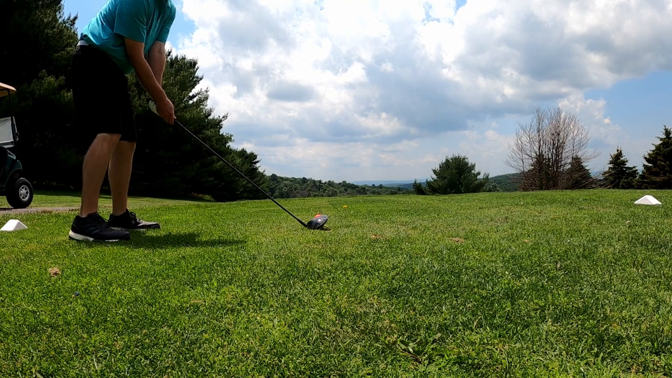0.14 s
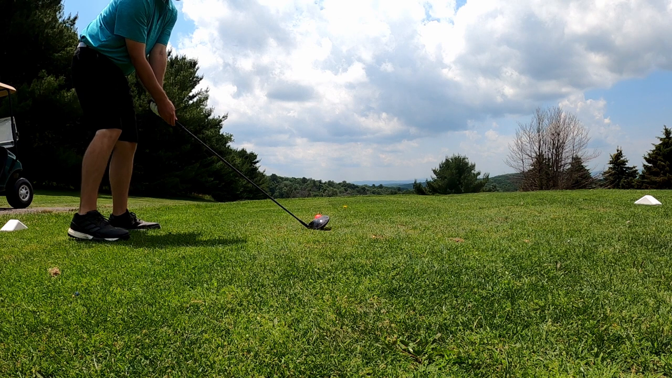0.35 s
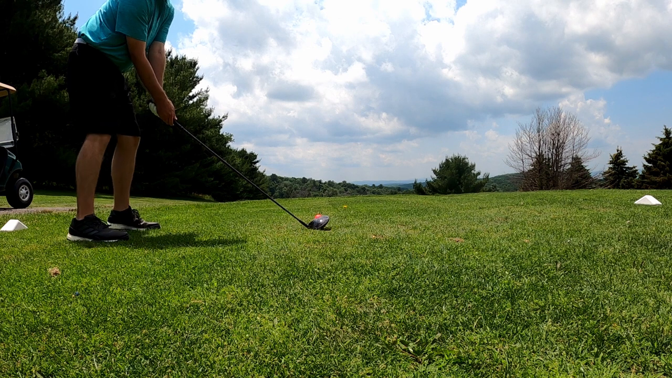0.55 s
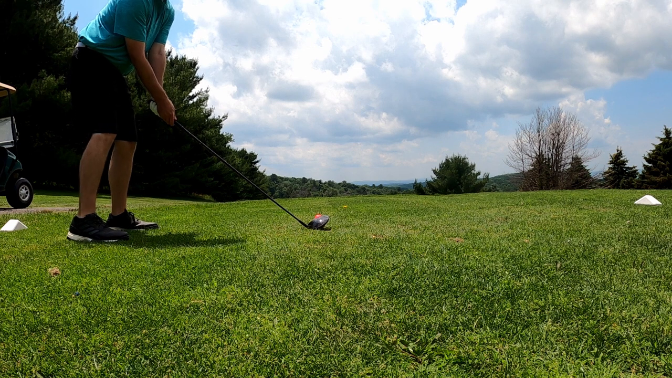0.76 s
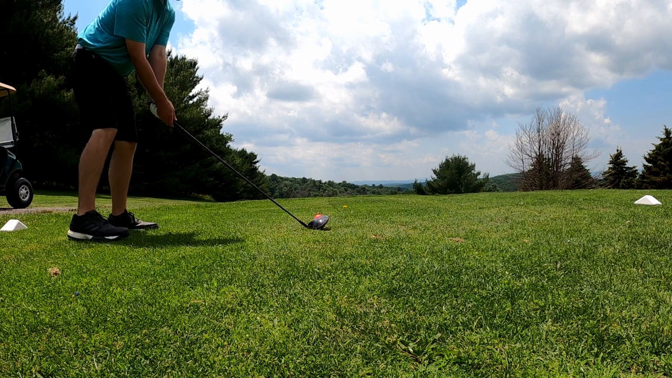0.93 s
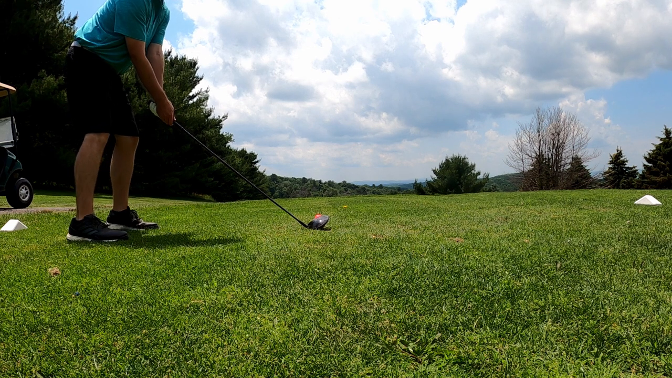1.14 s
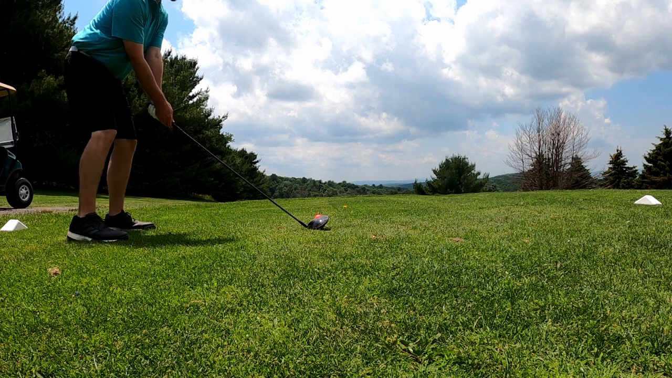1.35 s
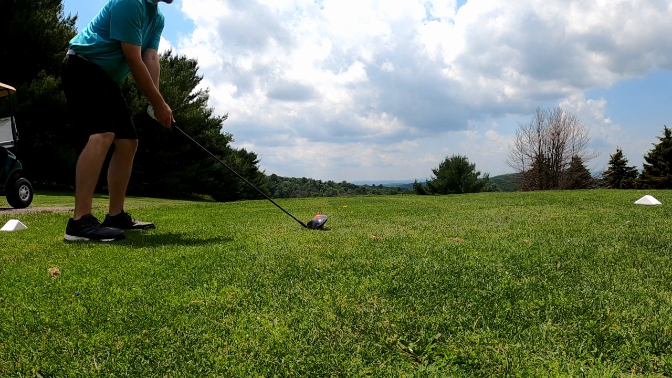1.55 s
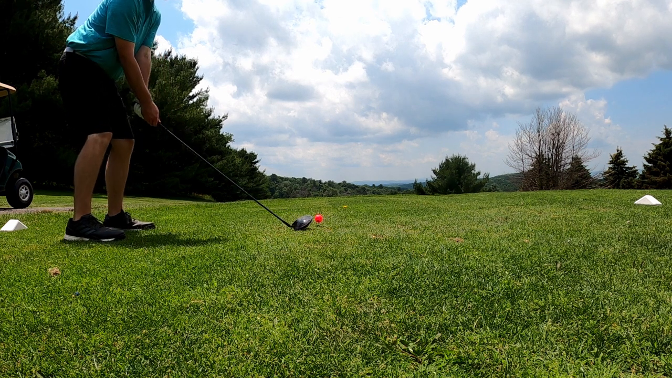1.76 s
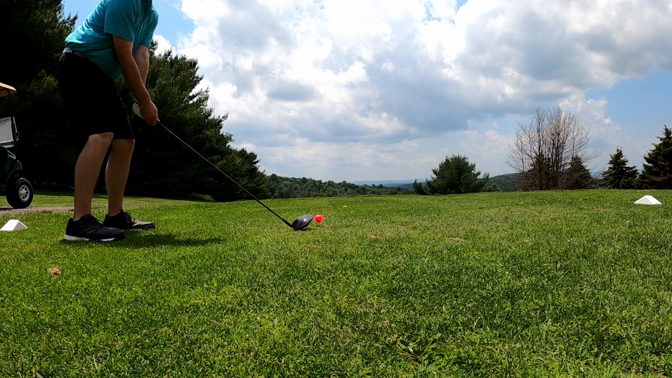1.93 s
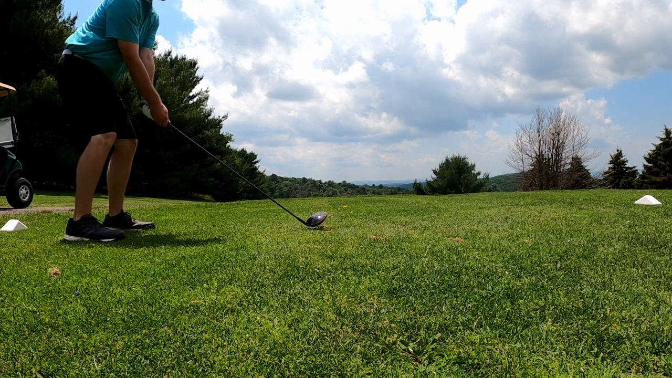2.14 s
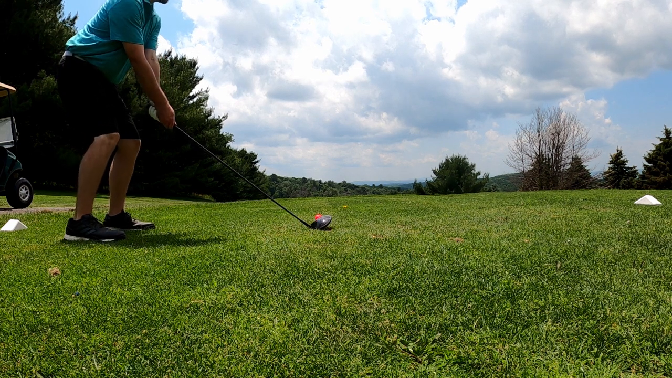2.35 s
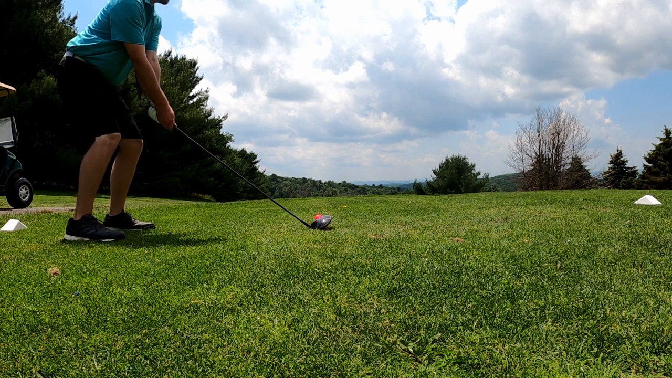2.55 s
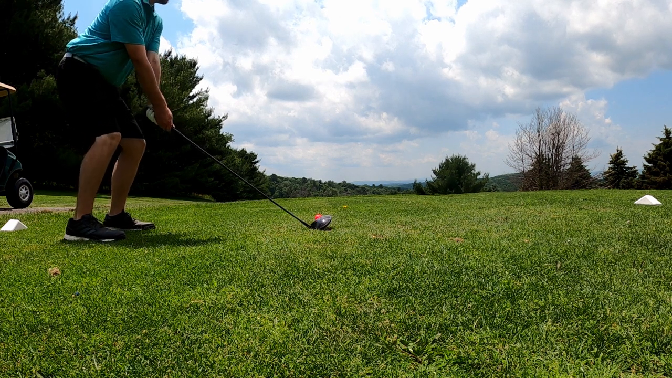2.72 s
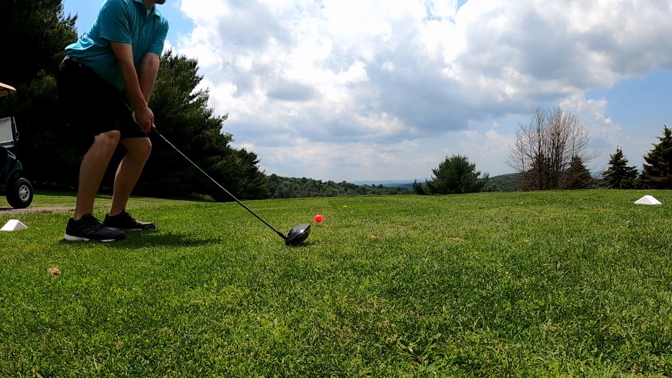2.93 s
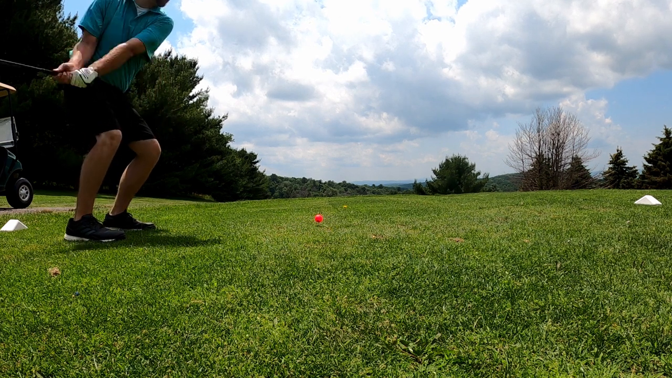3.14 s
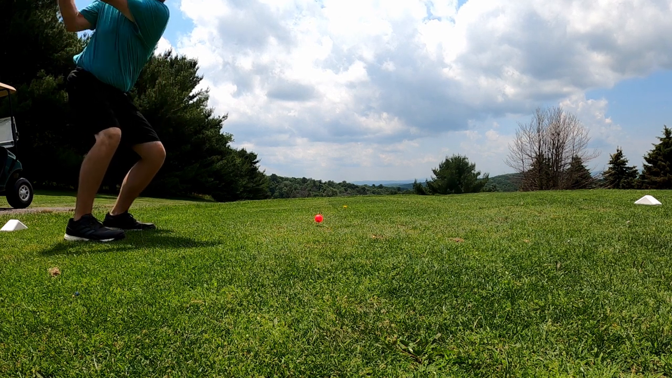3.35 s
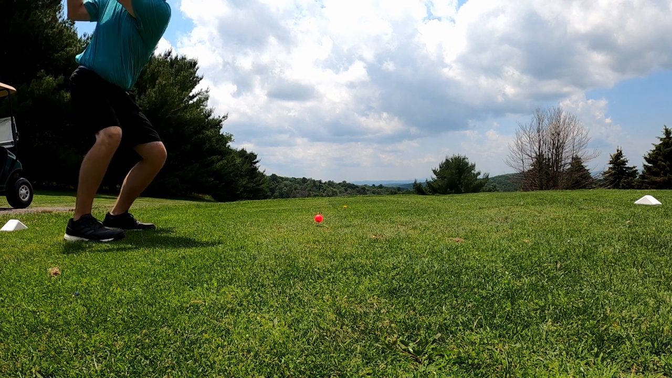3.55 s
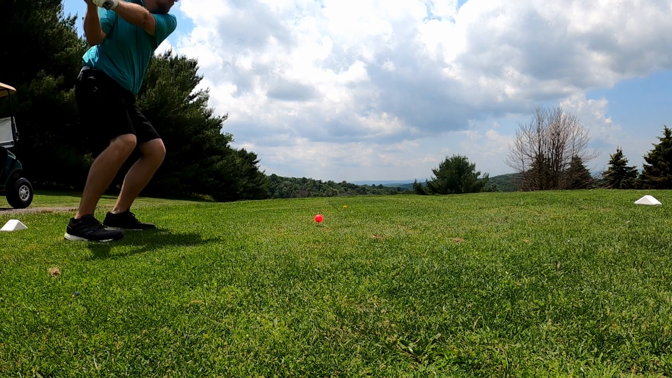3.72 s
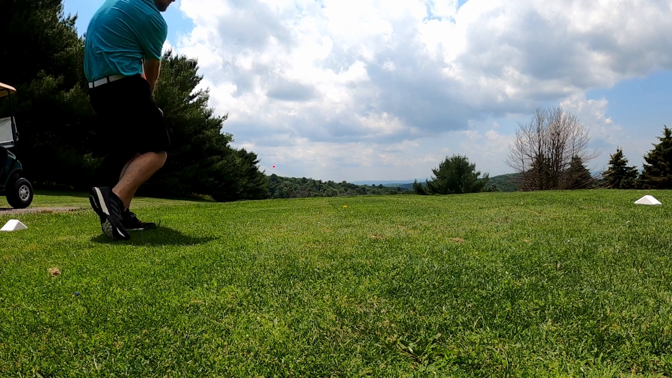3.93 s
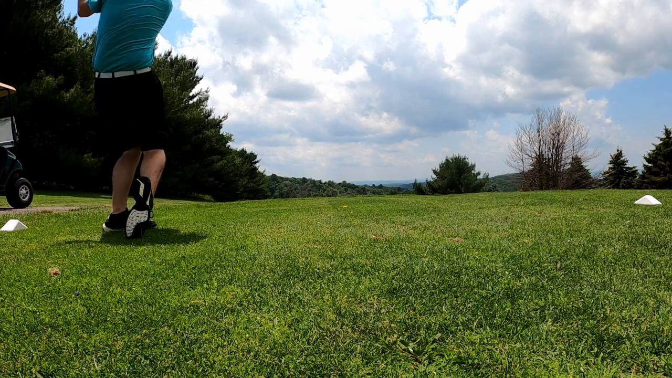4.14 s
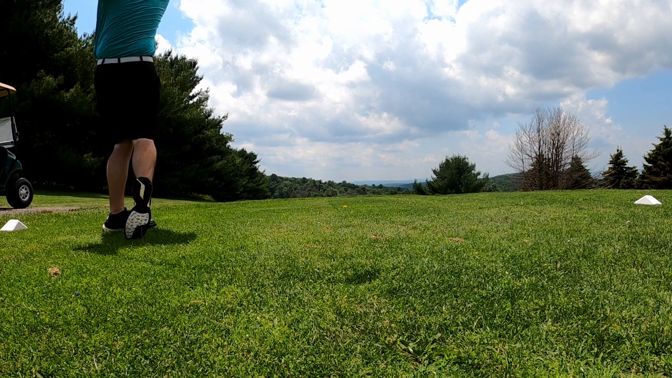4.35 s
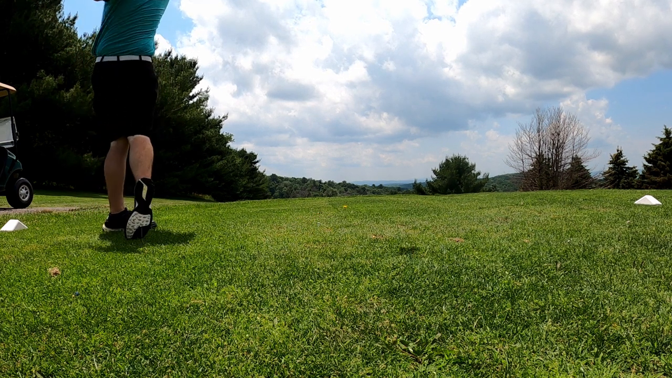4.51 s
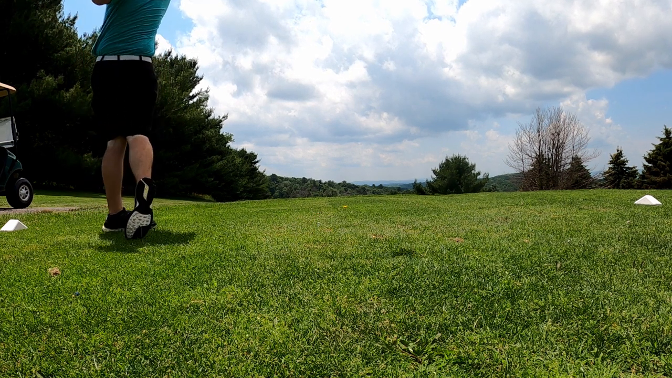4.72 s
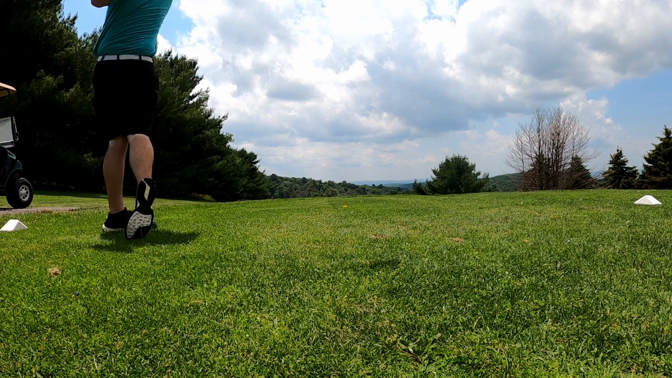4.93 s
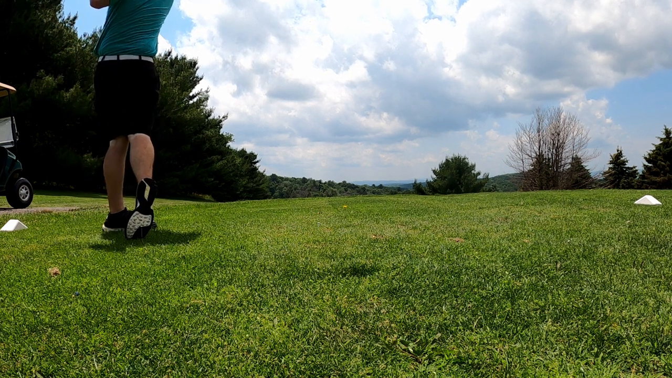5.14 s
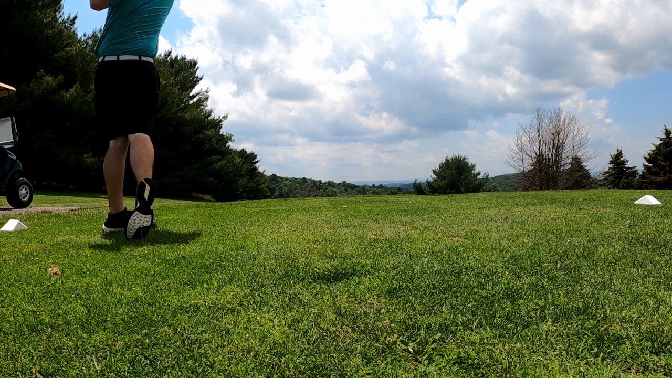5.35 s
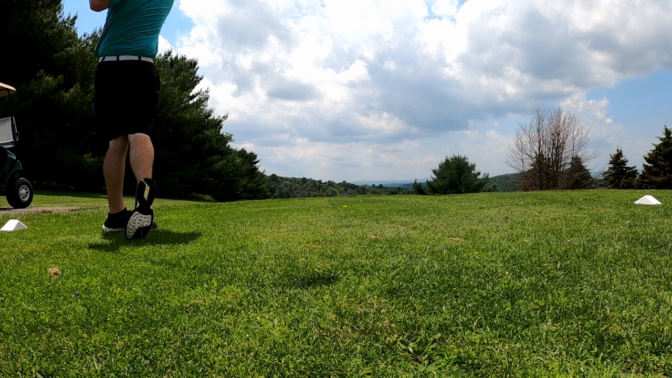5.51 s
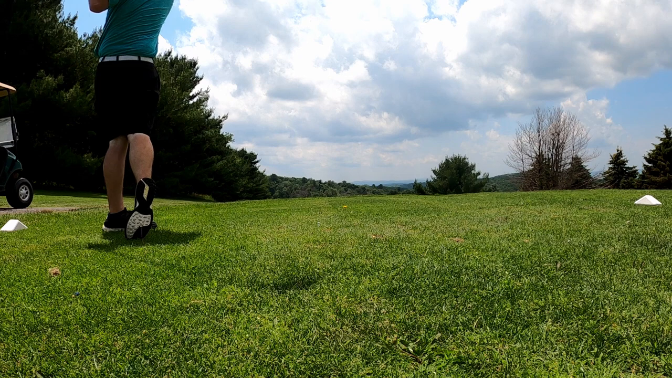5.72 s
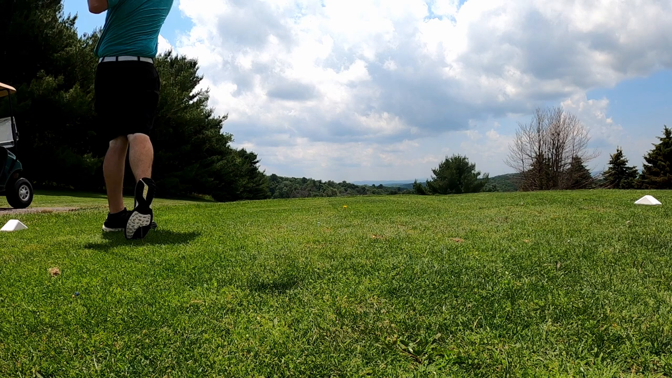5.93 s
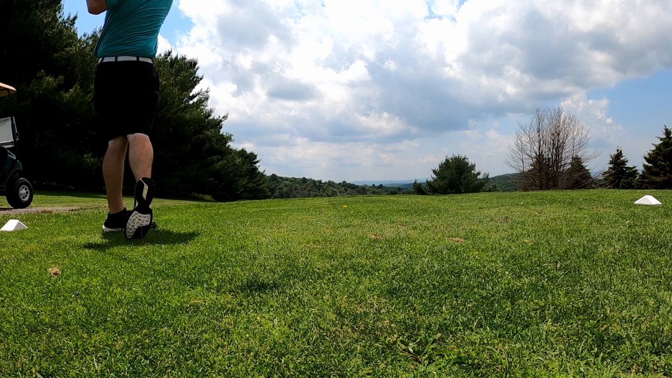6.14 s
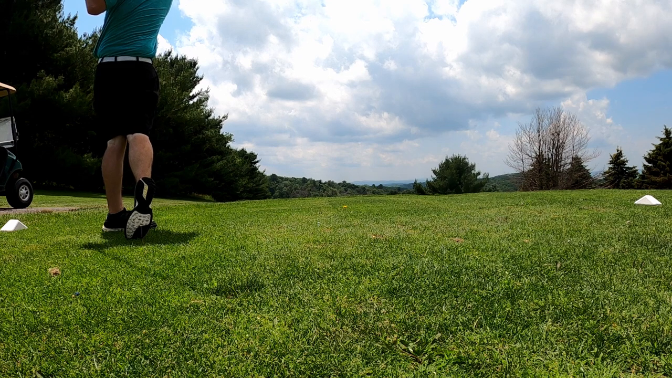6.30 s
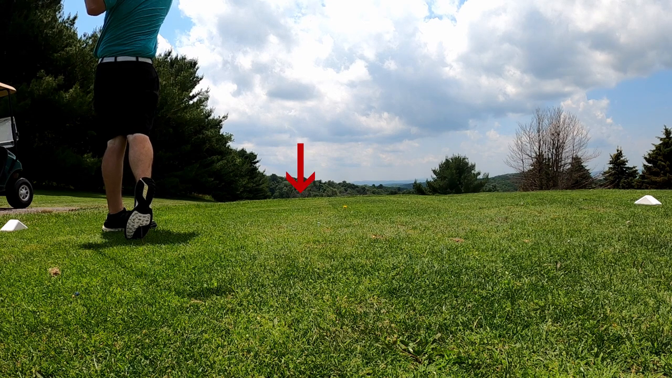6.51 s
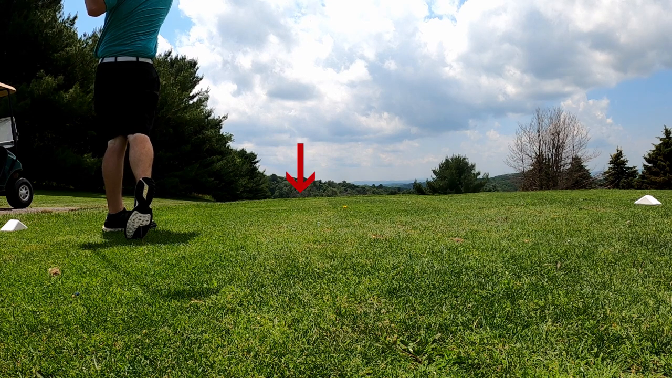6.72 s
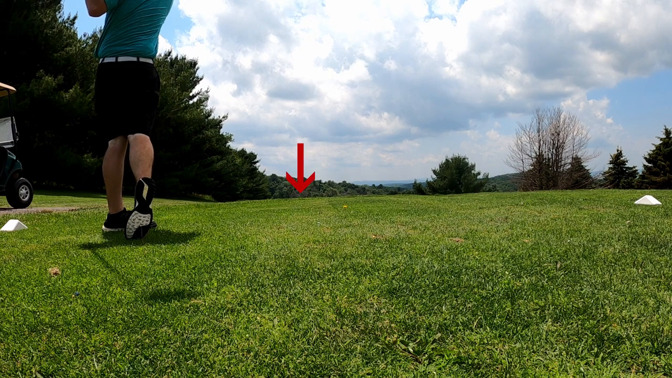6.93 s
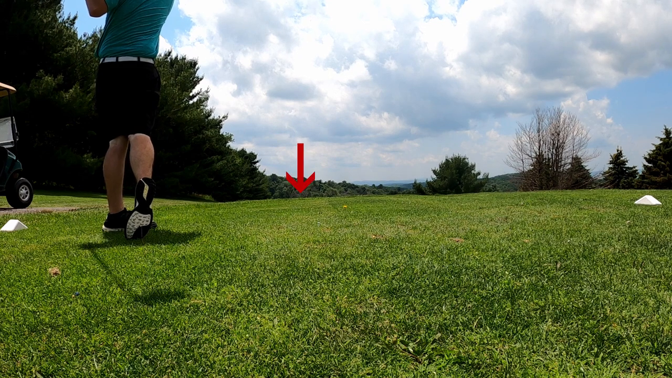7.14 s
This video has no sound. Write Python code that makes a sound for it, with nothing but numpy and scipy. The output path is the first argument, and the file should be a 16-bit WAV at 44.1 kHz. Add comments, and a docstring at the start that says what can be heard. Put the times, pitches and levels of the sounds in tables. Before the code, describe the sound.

Wind buffets a microphone lying in the grass of a golf tee throughout, a low rumble with uneven gusts and soft thumps. Behind it are a faint distant motor drone and stirring leaves. For the first four seconds, songbirds whistle, trill and buzz quietly from the trees. Around 3 seconds the club head brushes faintly over the grass. At about 3.8 seconds a quick whoosh builds, and at 4 seconds the club hits the ball a few steps away with one sharp crack and a very brief metallic ring, by far the loudest sound. A soft swish and a faint echo from the trees follow. From about 4.9 seconds a nearer sparrow begins a rapid, dry, high trill that grows louder, joined by a few buzzy notes and a second thin bird call. The trill and gusts continue to the end, with a stronger wind thump at about 7 seconds.

```python
"""A golf tee in open country, heard from a small camera lying in the grass a few steps from the golfer.
The club brushes back over the grass, whooshes down and cracks against the ball; its hollow metal head
rings, and a line of trees throws the crack back. Wind buffets the two microphone ports. Songbirds
whistle and trill from the trees, and a near sparrow starts up after the shot. Behind it all lie
stirring leaves, a distant motor and the wash of the countryside."""
import sys
import numpy as np
from scipy import signal
from scipy.fft import rfft, irfft
from scipy.io import wavfile
from scipy.ndimage import uniform_filter1d, map_coordinates

SR = 44100
rng = np.random.default_rng(int(sys.argv[2]) if len(sys.argv) > 2 else 0)


def store_wav(level_fs):
    """Save 16-bit WAV to argv[1]."""
    pcm = np.round(np.clip(np.atleast_2d(level_fs), -1, 1) * 32767)
    wavfile.write(sys.argv[1], SR, pcm.T.astype(np.int16))


N = 316223
TIME = np.arange(N) / SR
HIT_S = 4.0096

# Below, gain_db is relative: the function that uses the table sets the final level.
# modes of the hollow metal club head: pitch_hz, gain_db, t60_s
CLUB_MODES = [(3020, -28.5, 0.0069), (3516, -30, 0.0098), (4485, -37, .012), (5104, -36.5, .09),
              (5626, -43, .055), (6130, -26.5, .03), (6370, -42, 0.076), (6700, -43, .1),
              (6910, -27.5, .022), (7335, -42, .05), (8900, -29, .02), (9150, -33, .046), (9520, -31, .025),
              (10090, -14, .0096), (11250, -24, .007), (12750, -31, .012), (13700, -33, .009)]
# the crack scattered off the turf: frequency_hz, gain_db
SPRAY_COLOUR = [(300, 1), (1400, -0.5), (2000, -5), (2500, -18), (3800, -12.5), (5000, -4.5), (6500, -1.5),
                (7800, -6), (9300, -2.5), (10800, -14), (12500, -14.5), (15000, -27)]
# the turf's reflection cancels the crack in narrow bands: frequency_hz, gain_db
TURF_NOTCHES = [(100, -1.5), (750, -2.5), (1100, 1), (1950, 3), (2250, -2), (2480, -16), (2850, 0),
                (7000, 2.5), (7700, -4), (8500, 2.5)]
# echo of the tree line, its outline: delay_s, gain_db; its colour: frequency_hz, gain_db
TREE_ECHO = [(0, -45.5), (.07, -32.5), (.095, -6), (.16, 0), (.24, -7), (.42, -22), (.9, -64)]
TREE_COLOUR = [(100, -11), (500, -5.5), (1200, -7.5), (2500, -2), (6000, -0.5), (8000, 5.5), (10000, -11.5),
               (15000, -12)]

# the club passing the microphone: time_s, head_gain_db, shaft_gain_db
SWING_LEVEL = [(3.72, -100, -100), (3.85, -68, -73.5), (3.9, -61.5, -67), (3.925, -51.5, -54.5),
               (3.945, -43.5, -42.5), (3.967, -33.5, -36.5), (3.99, -36, -42.5), (4.006, -25.5, -47),
               (4.02, -42.5, -52), (4.045, -58, -65.5), (4.08, -70.5, -76.5)]
# air torn by the head, and the hiss of the shaft: frequency_hz, gain_db
HEAD_COLOUR = [(80, -10.5), (200, 6.5), (500, 1.5), (900, -1), (1500, -2), (2200, -12.5), (3500, -23),
               (8000, -50)]
SHAFT_COLOUR = [(1000, -24.5), (2500, -4.5), (4000, -4), (5800, 0.5), (7500, -6.5), (9500, -17.5),
                (12000, -24.5), (15000, -30.5), (16000, -55.5)]
# the shaft sings as it gathers speed: start_s, length_s, gain_db, start_hz, end_hz
SHAFT_TONES = [(3.895, .036, -59, 5300, 6900), (3.924, .028, -43.5, 6020, 6670)]
# soft swish overhead and on the way down: time_s, gain_db; its colour: frequency_hz, gain_db
DOWNSWING_LEVEL = [(3.68, -110), (3.74, -72), (3.77, -62.5), (3.84, -61.5), (3.88, -57.5), (3.93, -58.5),
                   (3.98, -110)]
DOWNSWING_COLOUR = [(400, -17), (750, -10), (1000, 3), (1400, 4), (1800, -4), (2400, -13.5), (5000, -18),
                    (8000, -22.5), (12000, -33), (15000, -42)]
# soft swish of the follow-through: time_s, gain_db; its colour: frequency_hz, gain_db
FOLLOW_LEVEL = [(4.03, -110), (4.05, -75.5), (4.09, -73.5), (4.105, -57.5), (4.14, -63), (4.17, -56),
                (4.23, -65.5), (4.42, -77.5), (4.75, -105)]
FOLLOW_COLOUR = [(300, -5), (1200, 2.5), (2300, -0.5), (3500, -3.5), (6000, -4.5), (7700, -7), (8800, -14),
                 (12000, -18), (15000, -30.5)]
# the club head brushing the grass: peak_s, width_s, level_db; its colour: frequency_hz, gain_db
BRUSH_STROKES = [(1.91, 0.03, -78), (2.97, 0.091, -71.5), (3.075, .055, -60.5)]
GRASS_COLOUR = [(530, -41.5), (900, -13), (1350, -1.5), (1630, -6), (2930, -2), (3800, -8), (7060, -8),
                (9740, -4), (15500, -15)]

# steady flow of air past the microphone ports: time_s, low_level_db, upper_level_db
AIRFLOW = [(0, -46, -50.5), (1.5, -41, -50.5), (2.8, -42, -51.5), (3.8, -41.5, -48.5), (4.3, -48, -57),
           (5.1, -42.5, -53.5), (6.4, -43, -51.5), (7.17, -39.5, -49)]
# gusts: peak_s, width_s, low_level_db, upper_level_db, left_over_right_db
GUSTS = [(.13, 0.024, -28, -50, -21), (.22, 0.058, -35, -53, -3), (.42, 0.053, -31.5, -49, 5),
         (.58, .12, -33, -51, 4), (.83, 0.056, -25.5, -45, -3.5), (1.05, .1, -34.5, -52, 3.5),
         (1.33, 0.03, -31.5, -56, 15), (1.53, 0.039, -24.5, -45, 7), (1.68, 0.081, -29, -42.5, 13),
         (1.88, 0.065, -33.5, -52, 11), (2.19, 0.063, -30.5, -51, 8), (2.3, 0.054, -29, -36.5, 5),
         (2.36, 0.064, -26.5, -44.5, 9), (2.52, 0.051, -33, -55, 11), (2.76, 0.066, -37.5, -51, 6),
         (3.01, 0.034, -26, -33.5, 10), (3.1, 0.035, -34, -52, 4), (3.29, 0.092, -30.5, -46, 7),
         (3.41, 0.023, -30, -44.5, 11), (3.51, 0.057, -28.5, -41, 1), (3.61, 0.053, -29, -51, 9.5),
         (3.72, 0.034, -30, -52, 8), (4.02, 0.079, -28.5, -37.5, 9), (4.49, .04, -34.5, -44.5, 7.5),
         (4.69, 0.07, -28, -39, 4.5), (4.78, 0.067, -28, -43.5, 6), (4.92, .13, -32, -51, 0.5),
         (5.37, 0.063, -33, -45.5, 7), (5.46, 0.053, -28, -37, 9.5), (5.831, 0.064, -30, -55, 2),
         (5.97, .15, -35, -58, -2), (6.8, .12, -38, -48, 4), (7.04, 0.074, -30, -43.5, 2.5),
         (7.14, 0.064, -21.5, -35.5, -3.5)]
# the two bands of wind rumble: frequency_hz, gain_db
LOW_RUMBLE = [(12, -12), (25, 0.5), (50, 1.5), (75, -4.5), (100, -7.5), (130, -19.5), (200, -39.5),
              (400, -91.5)]
UPPER_RUMBLE = [(60, -28.5), (100, 0.5), (145, 0), (190, -8.5), (260, -25.5), (400, -37), (800, -51),
                (2500, -86.5)]
# single eddies that thump a port: start_s, peak_db, pitch_hz, left_over_right_db
EDDIES = [(0.801, -28.5, 85, -9), (1.516, -27.5, 93, 12), (1.663, -25, 55, 14), (2.292, -32, 110, 10),
          (2.999, -24.5, 78, 12), (4.68, -29, 120, 9), (5.44, -27.5, 89.9, 8), (7.136, -21, 119, 7)]

# the swell of the near sparrow's trill: time_s, gain_db
SPARROW_LEVEL = [(4.855, -80), (4.97, -69), (5.3, -67.5), (5.75, -58), (6.3, -56), (7.1, -55)]
# even steps along one arched, falling syllable: share_of_top_pitch, gain_db
SPARROW_SYLLABLE = [(.83, 3.5), (.96, 5), (1, 2.5), (0.93, -4.5), (.86, -7.5), (.75, -0.5), (.67, -1.5),
                    (.59, -2), (0.4, -3)]
# nearby trunks and ground throw the trill back: delay_s, gain_db
SPARROW_ECHOES = [(.016, -17), (.037, -14)]
# slurred notes of a carolling songbird: start_s, length_s, level_db, start_hz, end_hz, warble_depth_hz
SLURS = [(0.022, 0.07, -61.5, 3180, 2730, 0), (0.096, 0.098, -67, 2760, 2230, 58),
         (.213, 0.016, -66, 3800, 2600, 0), (0.225, 0.034, -67, 2520, 2430, 0),
         (0.604, 0.032, -63.5, 2450, 3340, 2), (.626, .024, -62, 3270, 2580, 0),
         (.647, 0.019, -58, 3400, 2320, 0), (.693, .022, -64, 2290, 3020, 0),
         (0.715, 0.02, -58.5, 2900, 2350, 1), (1.046, .041, -67.5, 2070, 2300, 0),
         (1.088, 0.063, -62.5, 3090, 2716, 59), (1.142, .12, -65.5, 2790, 2230, 57),
         (1.274, .018, -61, 3920, 2740, 0), (1.282, .036, -62, 2680, 2430, -1),
         (1.705, 0.058, -61, 3310, 2720, 219), (2.182, 0.11, -68, 2260, 2550, 2),
         (2.246, .03, -63.5, 2640, 2200, 0), (2.357, .028, -67, 2420, 2150, 3),
         (2.73, 0.027, -62, 3130, 3400, -1), (2.758, 0.032, -56, 2820, 3330, 1),
         (2.777, 0.062, -60, 3300, 2224, 131), (2.862, 0.077, -65.5, 2780, 2395, 200),
         (3.115, 0.019, -66, 3600, 3110, 0), (3.304, .06, -65.5, 3110, 3630, -1),
         (3.372, 0.075, -66, 2820, 2510, 60), (4.05, .063, -70.5, 3050, 2730, -0.5),
         (4.219, .04, -63.5, 3300, 2470, 0)]
# even-pitched whistles: start_s, length_s, level_db, pitch_hz
WHISTLES = [(1.775, 0.046, -65.5, 2210), (2.212, .11, -61, 3110), (2.274, 0.08, -71, 2126),
            (2.537, .11, -67.5, 3100), (2.828, .11, -59.5, 3070), (3.074, 0.044, -59.5, 4170),
            (3.42, .019, -58.5, 3043), (3.49, .12, -75, 7200), (3.498, .15, -63.5, 6550),
            (3.691, .12, -72, 3060)]
# thin calls that rise and level off: start_s, level_db
THIN_CALLS = [(-.005, -68.5), (1.381, -65.5), (2.728, -67)]
# arched calls: start_s, length_s, level_db, top_hz
ARCHED_CALLS = [(.247, .062, -63.5, 6560), (5.164, .051, -64.5, 6810)]
# chips that fall steeply and end in an upward flick: start_s, level_db
CHIPS = [(2.345, -65.5), (2.657, -66.5), (2.943, -66), (3.16, -65.5)]
# buzzy notes: start_s, length_s, gain_db, start_hz, end_hz
BUZZES = [(0.369, 0.23, -60.5, 3410, 3730), (0.627, 0.21, -61.5, 3390, 3670),
          (0.849, 0.091, -69.5, 3460, 3630), (5.326, .2, -65, 3440, 3730), (5.56, .19, -62.5, 3366, 3750),
          (5.81, 0.18, -61.5, 3390, 3614), (6.06, 0.17, -69, 3270, 3480)]
# a far bird's trill: time_s, gain_db; the path of each rising flick: pitch_hz
FAR_TRILL_LEVEL = [(0, -70.5), (.75, -66), (1.2, -71.5), (2.15, -69.5)]
FAR_TRILL_PITCH = [3732, 4750, 6760]

# leaves and grass in the breeze: time_s, level_db; their colour: frequency_hz, gain_db
LEAF_LEVEL = [(0, -69), (.75, -70), (1.05, -74), (1.5, -68), (1.9, -75.5), (2.7, -83.5), (3.4, -68),
              (3.7, -80), (4.5, -87), (7.17, -75.5)]
LEAF_COLOUR = [(300, -15.5), (700, -6), (1300, 0), (2200, -6.5), (4000, -7), (6000, -9), (8000, -16),
               (11000, -28), (15000, -34)]
# a distant motor's drone, and the far countryside: frequency_hz, gain_db
MOTOR_COLOUR = [(90, -29.5), (132, -12), (146, -0.5), (160, -16), (200, -18.5), (300, -44.5), (600, -80)]
COUNTRY_COLOUR = [(150, -32.5), (250, 3), (277, 0.5), (815, -16.5), (1130, -14.5), (2130, -23), (3810, -25),
                  (4600, -27), (5650, -31), (6370, -31), (8670, -45.5), (10600, -53.5), (15000, -54.5)]


def strike(push_hz=1180, thud_hz=260, thud_t60_s=.011, spray_t60_s=.05, contact_s=.00033,
           rebound_s=.00018):
    """Head and ball jolt the air in one push and pull; the metal shell rings and the turf scatters it."""
    t = np.arange(-SR // 200, SR // 4) / SR
    phase = 2 * np.pi * push_hz * t
    push = -phase * np.exp((1 - phase ** 2) / 2)
    free_s = np.maximum(t - contact_s, 0)  # the shell rings once the ball has left the face
    ring = sum(amp(db - 60 * free_s / t60) * np.sin(2 * np.pi * hz * free_s)
               for hz, db, t60 in CLUB_MODES)
    thud = amp(-5 - 60 * free_s / thud_t60_s) * np.sin(2 * np.pi * thud_hz * free_s)
    rebound = amp(-7) * np.exp(-((t - 2 * contact_s) / rebound_s) ** 2)  # the face springs back
    spray = unit(colour(rng.standard_normal(len(t)), SPRAY_COLOUR))
    spray *= amp(-26 - 60 * free_s / spray_t60_s) * (free_s > 0)
    out = np.zeros(N)
    add(out, HIT_S + t[0], colour(push - ring + thud + rebound + spray, TURF_NOTCHES))
    return out


def swing():
    """The shaft hisses at full speed; the head drags a lower, lumpy wake past the microphone."""
    head = amp(curve(SWING_LEVEL) + 2 * wander(N, 93)) * noise(HEAD_COLOUR, shared=.92)
    shaft = amp(curve(SWING_LEVEL, column=2) + 2.8 * wander(N, 149.8)) * noise(SHAFT_COLOUR, shared=.32)
    down = amp(curve(DOWNSWING_LEVEL) + 1.2 * wander(N, 70)) * noise(DOWNSWING_COLOUR, shared=.97)
    follow = amp(curve(FOLLOW_LEVEL) + 1.2 * wander(N, 70)) * noise(FOLLOW_COLOUR, shared=.95)
    for start_s, length_s, db, start_hz, end_hz in SHAFT_TONES:
        add(shaft, start_s, chirp(slur(length_s, start_hz, end_hz), db))
    passing = (TIME > SWING_LEVEL[0][0]) & (TIME < SWING_LEVEL[-1][0])
    return (head + shaft) * passing + down + follow


def drive():
    """Swing and crack a few steps away, a little to the right, and their echo from the tree line."""
    direct = swing() * pan(-.8) + from_right(strike()) * amp(1.5)
    echo = colour(scatter(direct.mean(0), TREE_ECHO), TREE_COLOUR)
    return direct + amp(-32.5) * echo


def grass_brush():
    """The club head rustles over the grass before the swing."""
    strokes = sum(amp(db) * bump(peak_s, width_s) for peak_s, width_s, db in BRUSH_STROKES)
    return strokes * amp(1.7 * wander(N, 180)) * noise(GRASS_COLOUR, shared=.42)


def wind(upper_lean=.7):
    """Right at the microphone: gusts swell out of a steady flow, and single eddies thump the ports."""
    low_power = amp(curve(AIRFLOW)) ** 2
    upper_power = amp(curve(AIRFLOW, column=2)) ** 2
    for peak_s, width_s, low_db, upper_db, lean_db in GUSTS:
        swell = bump(peak_s, width_s)
        low_power = low_power + (swell * amp(low_db) * unit(pan(lean_db))) ** 2
        upper_power = upper_power + (swell * amp(upper_db) * unit(pan(upper_lean * lean_db))) ** 2
    out = turbulence(LOW_RUMBLE, shared=.17, steadiness=.5) * np.sqrt(low_power)
    out += turbulence(UPPER_RUMBLE, shared=.42, steadiness=.41) * np.sqrt(upper_power)
    t = np.arange(SR // 8) / SR
    for start_s, db, hz, lean_db in EDDIES:
        turns = hz * t
        thump = np.sin(2 * np.pi * turns) * 2 * turns * np.exp(1 - 2 * turns)
        add(out, start_s, pan(lean_db) * amp(db) * thump)
    return out


def turbulence(spectrum, shared, steadiness):
    """Rumble at the ports, its own swells partly evened so that the gusts lead."""
    rumble = noise(spectrum, shared)
    power = uniform_filter1d((rumble ** 2).mean(0), size=2600) + 1e-9
    return unit(rumble / power ** (steadiness / 2))


def sparrow(start_s=4.853, gap_s=.07483, syllable_s=.048, lag_s=.009, settle_s=.2,
            top_hz=6290, sag_hz_per_s=105):
    """Close by, a dry trill settles into its pace, swells and sinks in pitch; a second bird joins."""
    out, size = np.zeros(N), round(syllable_s * SR)
    pitch_share, shape_db = (glide(column, size) for column in np.transpose(SPARROW_SYLLABLE))
    for k in range(31):
        age_s = k * gap_s
        onset_s = start_s + age_s + lag_s * (1 - np.exp(-age_s / settle_s))
        peak_hz = (top_hz - sag_hz_per_s * age_s) * (1 + .005 * rng.standard_normal())
        db = curve(SPARROW_LEVEL, t=onset_s) + .6 * rng.standard_normal()
        syllable = chirp(peak_hz * pitch_share, 0, flutter_db=1.26, waver=.008) * amp(shape_db)
        add(out, onset_s, amp(db) * unit(syllable))
    out += second_bird()
    echoes = np.zeros((2, N))
    for delay_s, db in SPARROW_ECHOES:
        add(echoes, delay_s, amp(db) * out)
    foliage = scatter(out, [(0, -25.5), (.015, -6), (.08, -20), (.3, -14.5), (.9, -84.5)])
    return from_right(out) * amp(2.03) + echoes + amp(-5.5) * foliage


def second_bird(start_s=5.822, gap_s=.0807):
    """Thin high slurs that grow louder, at a slower pace than the sparrow's."""
    out = np.zeros(N)
    pitch_hz = glide([7510, 6670, 6505, 6400], round(.02 * SR))
    for k in range(17):
        add(out, start_s + k * gap_s, chirp(pitch_hz, db=-76 + .5 * k))
    return out


def far_birds(buzz_hz=345, buzz_depth_hz=240, throb=.6):
    """Off in the trees: whistled or warbled notes and swelling, up-bent buzzes."""
    out = np.zeros(N)
    for start_s, pitch_hz, db in bird_notes():
        add(out, start_s, chirp(pitch_hz, db, flutter_db=1.5, waver=.006))
    for start_s, length_s, db, start_hz, end_hz in BUZZES:
        t = np.arange(round(length_s * SR)) / SR
        carrier_hz = start_hz + (end_hz - start_hz) * np.sin(np.pi / 2 * t / length_s)
        # pitch and strength shake together
        shake = 2 * np.pi * np.cumsum(buzz_hz * (1 + .08 * wander(len(t), 120))) / SR
        swell = amp(5.4 * (t / length_s - 1.5)) * (1 + throb * np.cos(shake))
        add(out, start_s, swell * chirp(carrier_hz + buzz_depth_hz * np.sin(shake), db))
    foliage = scatter(out, [(0, -6.5), (.008, 1), (.04, -11), (.2, -34), (.9, -91)])
    return from_right(out) + amp(-6.5) * foliage


def bird_notes(warble_hz=46, warble_jitter=.22):
    """Every slur, whistle, call and chip of the far birds as start_s, pitch_hz (a path), level_db."""
    for start_s, length_s, db, start_hz, end_hz, depth_hz in SLURS:
        pitch_hz = slur(length_s, start_hz, end_hz)
        turns = np.cumsum(warble_hz * (1 + warble_jitter * wander(len(pitch_hz), 60))) / SR
        yield start_s, pitch_hz + depth_hz * np.sin(2 * np.pi * turns), db
    for start_s, length_s, db, hz in WHISTLES:  # even these start and end slightly lower
        yield start_s, hz * glide([.986, 1, .986], round(length_s * SR)), db
    for start_s, db in THIN_CALLS:
        yield start_s, glide([6680, 7520, 7530], round(.064 * SR)), db
    for start_s, length_s, db, top_hz in ARCHED_CALLS:
        yield start_s, top_hz * glide([.88, 1, .88], round(length_s * SR)), db
    for start_s, db in CHIPS:  # the fall, then the softer flick
        yield start_s, glide([5600, 5360, 3809], round(.029 * SR)), db
        yield start_s + .039, glide([5563, 6494, 7250], round(.012 * SR)), db - 9.5


def far_trills(start_s=.045, gap_s=.0845, slowing_s=.00018, rattle_start_s=3.19, rattle_gap_s=.016):
    """Far off, a slowing trill of rising flicks and a quick rattle, blurred by the foliage."""
    out, size = np.zeros(N), round(.034 * SR)
    for k in range(25):
        onset_s = start_s + k * (gap_s + slowing_s * k / 2)
        pitch_hz = glide(FAR_TRILL_PITCH, size) * rng.normal(1.01, .01)
        flick = chirp(pitch_hz, curve(FAR_TRILL_LEVEL, t=onset_s), flutter_db=2.5, waver=.011)
        add(out, onset_s, flick * amp(glide([-9, 0, -2], size)))
    up_hz = glide([4900, 5700, 6400], round(.0059 * SR))
    down_hz = glide([4650, 4250, 3800], round(.013 * SR))
    for k in range(11):  # each beat of the rattle: a flick up, then a slur down
        onset_s, db = rattle_start_s + k * rattle_gap_s, -66 - .5 * k
        add(out, onset_s, chirp(up_hz, db, waver=.015))
        add(out, onset_s + .005, chirp(down_hz, db, waver=.015))
    return from_right(out) + scatter(out, [(0, -2.5), (.01, 4), (.05, -12), (.9, -85)])


def countryside():
    """The background: a far wash, a distant motor's drone and leaves stirring in the breeze."""
    wash = amp(-66) * noise(COUNTRY_COLOUR, shared=.43) * amp(.5 * wander(N, 5))
    motor_db = curve([(0, -52.5), (2, -48.5), (3.7, -51), (5, -55.5), (7.17, -58)])
    motor = amp(motor_db) * noise(MOTOR_COLOUR, shared=.99)
    leaves = amp(curve(LEAF_LEVEL) + 1.4 * wander(N, 25)) * noise(LEAF_COLOUR, shared=.32)
    return wash + motor + leaves


def scatter(x, outline):
    """Countless small echoes from foliage, each port its own, under an outline of delay_s, gain_db."""
    t = np.arange(SR) / SR
    tail = rng.standard_normal((2, SR)) * amp(curve(outline, t=t))
    return signal.fftconvolve(x[None], tail / np.linalg.norm(tail[0]), axes=1)[:, :N]


def from_right(x):
    """A sound from the right reaches the left port a moment later, its treble shaded by the camera."""
    shaded = colour(np.roll(x, 1), [(100, -1), (1500, -1), (5000, -2), (10000, -3), (14000, -5)])
    return np.array([shaded, x])


def chirp(pitch_hz, db, flutter_db=2.0, waver=.0047):
    """One near-sine whistled note, slightly unsteady in pitch and strength."""
    size = len(pitch_hz)
    tone = np.sin(2 * np.pi * np.cumsum(pitch_hz * (1 + waver * wander(size, 160))) / SR)
    return amp(db) * unit(tone * signal.windows.tukey(size, .45) * amp(flutter_db * wander(size, 110)))


def slur(length_s, start_hz, end_hz, time_constants=3.2):
    """A pitch that leaves its start quickly and settles on its end."""
    remaining = np.exp(-time_constants * np.linspace(0, 1, round(length_s * SR)))
    return start_hz + (end_hz - start_hz) * (1 - remaining) / (1 - remaining[-1])


def glide(points, size):
    """A smooth path through evenly spaced points."""
    at = np.linspace(0, len(points) - 1, size)
    return map_coordinates(np.array(points, float), [at], order=2, mode="nearest")


def bump(peak_s, width_s):
    """A bell-shaped swell of height 1; its width is taken at half power."""
    return np.exp(-2 * np.log(2) * ((TIME - peak_s) / width_s) ** 2)


def curve(rows, column=1, t=TIME):
    """One column of a table, joined by straight lines in time."""
    rows = np.array(rows)
    return np.interp(t, rows[:, 0], rows[:, column])


def noise(spectrum, shared):
    """Coloured noise of rms 1 at two ports that share a part of their power."""
    white = rng.standard_normal((3, N))
    return unit(colour(np.sqrt(shared) * white[2] + np.sqrt(1 - shared) * white[:2], spectrum))


def colour(x, spectrum):
    """Filters by points of frequency_hz, gain_db."""
    hz, db = np.transpose(spectrum)
    f = np.fft.rfftfreq(x.shape[-1], 1 / SR)
    return irfft(rfft(x) * amp(np.interp(np.log(f + 1), np.log(hz + 1), db)), x.shape[-1])


def wander(size, rate_hz):
    """A smooth random drift of rms 1, up to the given rate."""
    f = np.fft.rfftfreq(size, 1 / SR)
    return unit(irfft(rfft(rng.standard_normal(size)) / (1 + (f / rate_hz) ** 4), size))


def pan(lean_db):
    """Left and right gains, the left louder by lean_db."""
    return amp(np.array([[lean_db], [-lean_db]]) / 2)


def add(mix, start_s, sound):
    """Mixes a sound in at a time."""
    part = mix[..., max(0, round(start_s * SR)):][..., :sound.shape[-1]]
    part += sound[..., :part.shape[-1]]


def amp(db):
    """Decibels to gain."""
    return 10 ** (np.asarray(db) / 20)


def unit(x):
    """Scales to rms 1."""
    return x / np.sqrt(np.mean(x ** 2) + 1e-20)


def scene():
    """Everything that reaches the microphone in the grass."""
    return wind() + countryside() + grass_brush() + drive() + far_birds() + far_trills() + sparrow()


def record(dry):
    """The crack softly overloads the camera's input; the treble ends at 16 kHz."""
    clipped = dry / (1 + dry ** 6) ** (1 / 6)
    lowpass = signal.firwin(255, 16000, window=("kaiser", 9), fs=SR)
    return signal.oaconvolve(clipped, lowpass[None], "same")


dry = scene()
out = record(dry)
store_wav(out)
```